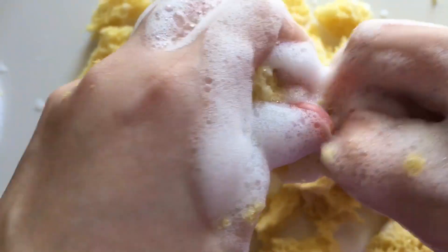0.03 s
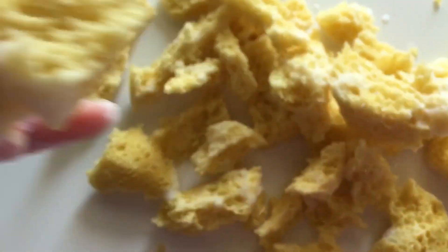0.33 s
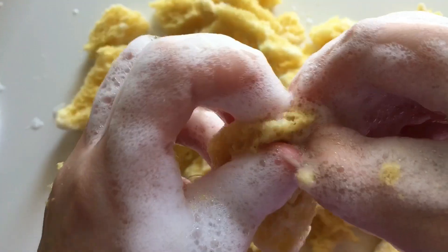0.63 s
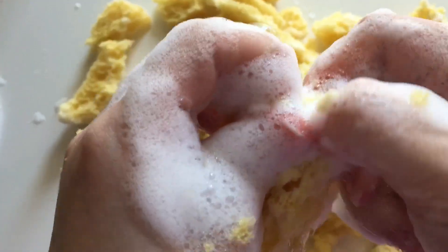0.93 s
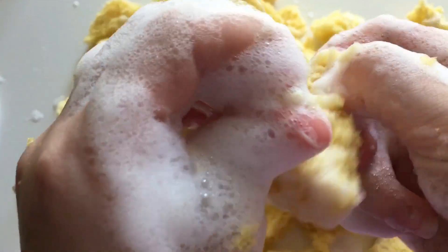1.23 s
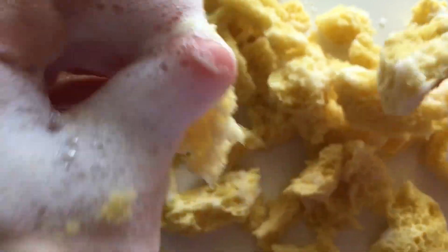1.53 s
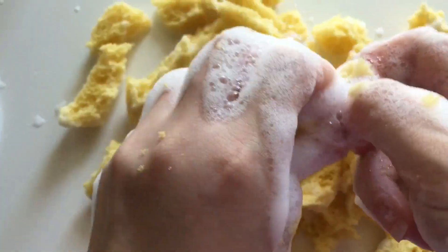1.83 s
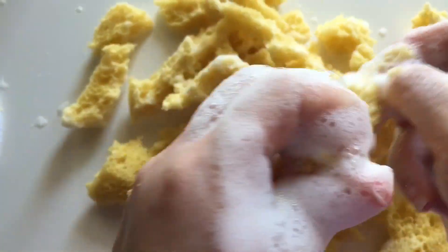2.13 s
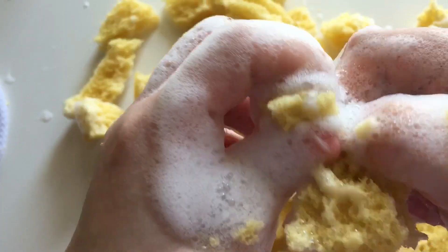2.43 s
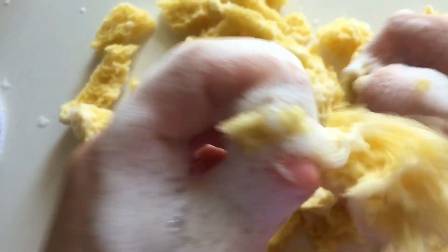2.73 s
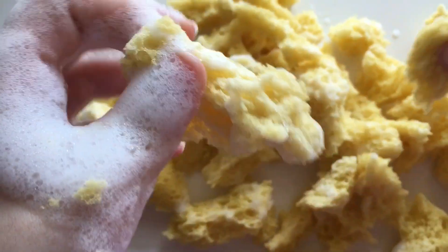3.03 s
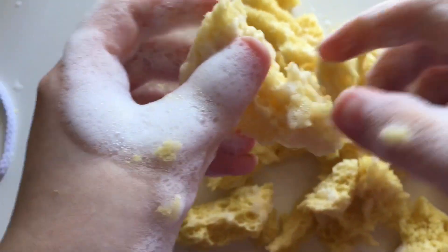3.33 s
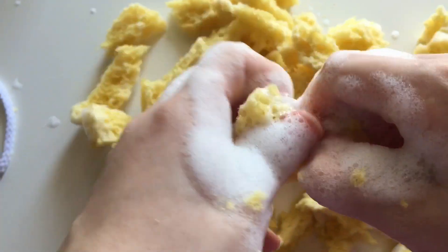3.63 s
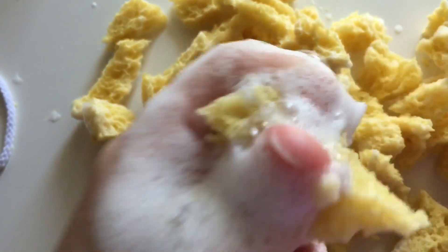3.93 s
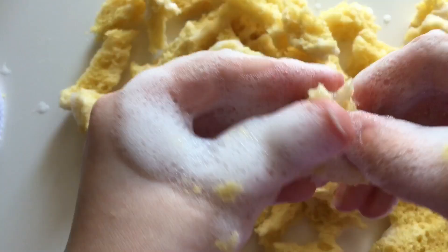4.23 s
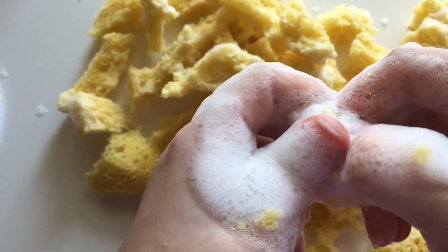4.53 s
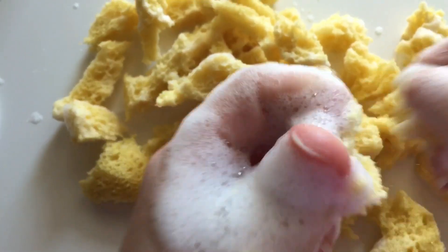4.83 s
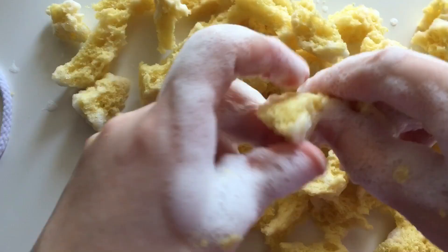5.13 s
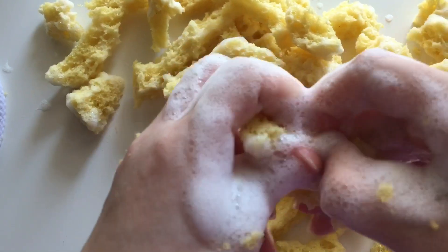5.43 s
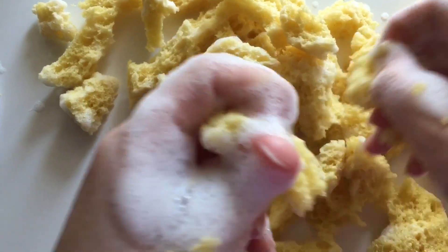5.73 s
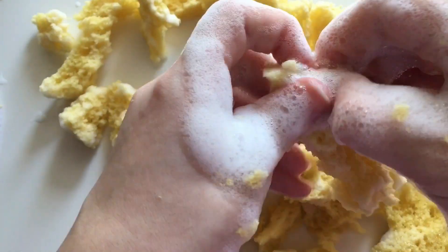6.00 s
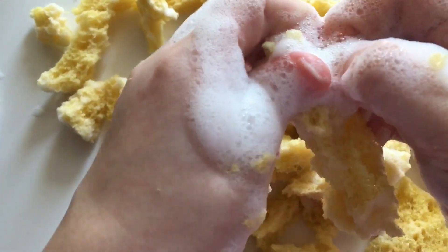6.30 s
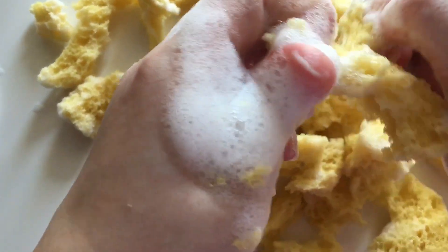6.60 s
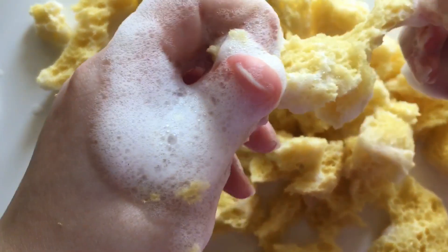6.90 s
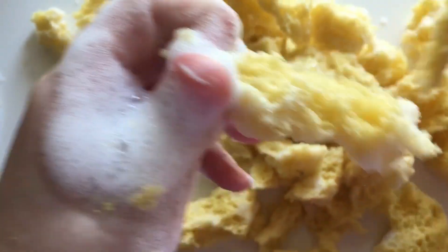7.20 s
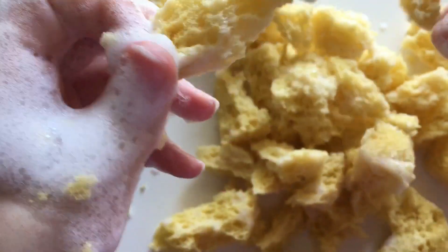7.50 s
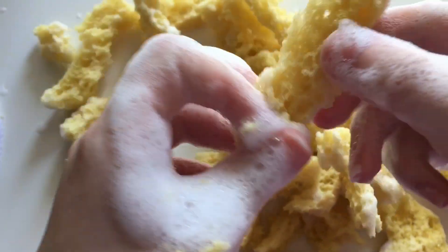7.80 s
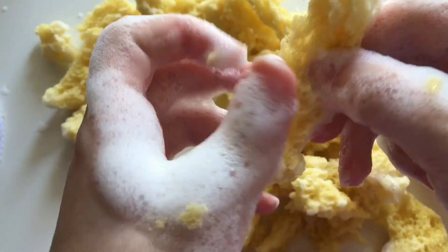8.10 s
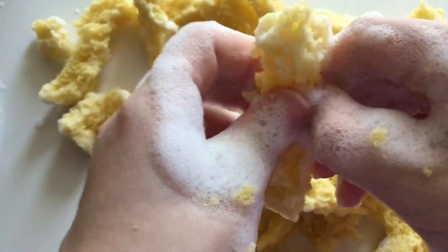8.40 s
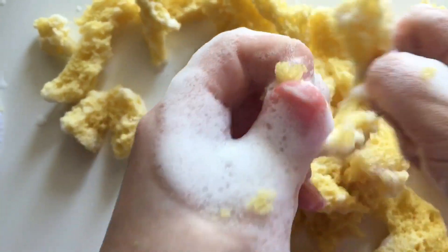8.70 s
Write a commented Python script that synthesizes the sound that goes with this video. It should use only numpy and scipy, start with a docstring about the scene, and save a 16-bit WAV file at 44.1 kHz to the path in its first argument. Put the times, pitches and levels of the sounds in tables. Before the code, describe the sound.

Hands tear a soapy sponge into pieces close to the microphone in a small quiet room. Short, wet, crackling rips come about once a second, some with sharp little snaps and a soft thud as a piece comes free. Between them, fingers knead the lather, which squishes, fizzes and pops quietly. A quick run of small tears comes late, then a lull and one last rip. A faint hum lies behind.

```python
"""A dense wet crackle, close by: hands tear a soapy sponge to pieces in a small quiet room.
In each rip the cell walls snap and the foam fizzes, exciting tiny air pockets as damped resonators.
The sound deepens as the tear opens, and the piece comes free with a soft thud.
Between rips the fingers knead the lather, which squelches and pops; a mains appliance hums behind.
Now and then a faint ring lingers or the level dips briefly."""
import sys
import numpy as np
from scipy import signal
from scipy.fft import rfft, irfft, next_fast_len
from scipy.io import wavfile
from scipy.ndimage import uniform_filter1d, map_coordinates

SR = 44100
rng = np.random.default_rng(int(sys.argv[2]) if len(sys.argv) > 2 else 0)


def wav_out(sig):
    """Save sig, one row per channel (or a flat mono array), as 16-bit PCM at SR to the path in sys.argv[1]."""
    wavfile.write(sys.argv[1], SR, np.round(np.clip(np.atleast_2d(sig).T, -1, 1) * 32767).astype(np.int16))


N = 385875

# Event levels are relative: each source applies its own overall gain.
# tearing pulls: start_s, end_s, tighten_s, wall_db, swell_db, foam_offset_db, pulp_offset_db
TEARING_PULLS = [(0.019, 0.031, 0.033, -30.5, -4, -6, -35), (0.083, 0.176, 0.072, -23, -0.5, -6.5, -14.5),
                 (0.947, 1.11, 0.54, -39.5, -21, -5.5, -16.5), (1.124, 1.277, 0.059, -30, -1, -4.5, -14),
                 (1.272, 1.346, .02, -25.5, 5, -7, -14.5), (1.946, 2.036, 0.28, -27, 1.5, -6, -16),
                 (2.035, 2.136, .02, -27.5, 1, -11.5, -16), (2.525, 2.634, 0.16, -27, 0.5, -12.5, -16.5),
                 (2.631, 2.715, .02, -23, 4, -10.5, -14), (3.802, 3.859, 0.15, -23, -3.5, -8.5, -19),
                 (4.719, 4.778, 0.033, -25.5, -3.5, -8.5, -13), (5.524, 5.658, 0.24, -31, -9, -2, -12),
                 (6.411, 6.48, 0.17, -26, 5, -7.5, -24), (6.482, 6.543, .02, -28, -4, -8, -11),
                 (6.66, 6.697, 0.024, -29, -12, -7.5, -14), (6.708, 6.729, 0.026, -32.5, -2, 2, -8),
                 (6.766, 6.78, 0.0099, -30.5, -11, -3.5, -13), (6.906, 6.949, 0.028, -35, -10, 2, -10),
                 (6.962, 6.985, 0.018, -29.5, -10, -1.5, -12), (7.069, 7.115, 0.0073, -36, -11, -2, -9),
                 (8.511, 8.587, 0.55, -32, -4, -13, -23), (8.58, 8.692, 0.024, -27, -9.5, -4, -12.5)]
# the thickest strands giving way: start_s, level_db
STRAND_SNAPS = [(0.0291, -14), (0.097, -14), (0.108, -4), (0.121, -11), (0.1398, -7), (0.156, -9),
                (0.1716, -14), (1.0037, -12.5), (1.056, -16.5), (1.087, -14.5), (1.1874, -14), (1.209, -21),
                (1.2443, -10.5), (1.3441, -9), (1.959, -15), (1.9862, -10), (1.9988, -12.5), (2.0293, -7),
                (2.0475, -7), (2.0858, -12), (2.095, -9), (2.6789, -15), (2.691, -4), (2.7133, -15),
                (3.8058, -9), (3.8207, -7), (3.8382, -14), (3.859, -21), (4.722, -10), (4.7546, -3.5),
                (5.546, -16), (5.5779, -14), (5.6549, -21), (6.5062, -10), (6.531, -9), (6.6572, -10),
                (6.723, -10), (6.7688, -11.5), (6.9132, -15), (6.923, -16), (6.9687, -17), (6.978, -13),
                (6.9851, -17), (7.0603, -14), (7.079, -17), (7.097, -26), (7.1098, -9), (8.529, -12),
                (8.5617, -18), (8.5973, -8)]
# a piece springing back or landing on the pile: start_s, level_db, pitch_hz
PIECE_THUDS = [(0.157, -14.5, 176), (0.182, -26.5, 73.5), (1.346, -24, 76.6), (2.678, -26, 280),
               (2.698, -15, 270), (2.715, -23, 119), (3.861, -31, 110), (5.624, -24.5, 340),
               (6.53, -21.5, 202), (6.724, -23.5, 352), (7.11, -19.5, 198), (7.255, -36, 62),
               (7.32, -34, 56), (8.612, -29, 334)]
# fingers squeezing the lather: firmest_s, press_s, let_go_s, squish_db, foam_offset_db
FINGER_SQUEEZES = [(0.06, 0.071, 0.068, -35.5, -6), (0.34, 0.043, 0.05, -51, -5),
                   (0.45, 0.1, 0.097, -49, -9), (0.644, 0.016, 0.044, -39.5, -2),
                   (0.74, 0.094, 0.031, -45, -19), (1.07, 0.14, 0.22, -38.5, -5),
                   (1.59, 0.083, 0.047, -55, -1), (1.689, 0.058, 0.065, -45.5, -3.5),
                   (2.28, 0.044, 0.29, -55.5, -14), (2.41, 0.032, 0.0088, -48, -10),
                   (3.06, 0.096, 0.073, -51.5, -5), (3.52, 0.13, .17, -42, -7.5),
                   (4.08, 0.073, 0.04, -46, -3.5), (4.37, 0.36, 0.18, -50, -7.5),
                   (4.68, 0.13, 0.044, -55.5, -6), (5.04, 0.14, 0.1, -52.5, -1.5),
                   (5.18, 0.057, 0.043, -47.5, -10), (5.29, 0.06, 0.081, -43, -6),
                   (5.91, 0.097, 0.029, -50.5, -1), (6.02, 0.15, 0.23, -50, -10),
                   (6.32, 0.016, 0.21, -51.5, 0.5), (6.6, 0.11, 0.17, -37.5, -1.5),
                   (6.86, 0.32, 0.12, -49.5, 8.5), (7.01, 0.13, 0.033, -42.5, 3),
                   (7.35, 0.034, 0.028, -53, 4), (7.951, 0.076, 0.059, -42.5, -5),
                   (8.209, 0.029, 0.015, -49, -13), (8.267, 0.011, 0.013, -46.5, -2.5),
                   (8.39, 0.031, 0.025, -53, 1)]
# fingers holding still: start_s, end_s
STILL_SPANS = [(0.785, 0.82), (1.41, 1.5), (3.15, 3.45), (4.55, 4.63), (6.735, 6.765), (7.16, 7.18),
               (7.41, 7.62), (8.11, 8.175)]
# soapy water and air forced through a gap in the grip: centre_s, length_s, level_db, pitch_hz
GAP_SQUELCHES = [(0.163, .012, -36, 330), (0.443, 0.096, -50, 1670), (1.241, 0.076, -35, 1900),
                 (1.326, .02, -43, 490), (1.945, 0.05, -36, 1920), (2.011, 0.055, -29, 4540),
                 (2.088, 0.038, -31, 3180), (2.472, 0.06, -51.5, 1850), (2.692, 0.008, -26.5, 623),
                 (3.848, 0.013, -31.5, 900), (3.856, 0.0058, -34, 540), (4.067, 0.034, -46, 1900),
                 (4.736, 0.028, -29.5, 3900), (4.854, 0.04, -53.5, 1800), (5.311, 0.058, -48.5, 2660),
                 (5.57, 0.072, -34, 3050), (7.107, 0.0058, -37, 380), (8.15, .01, -53, 600),
                 (8.495, 0.038, -39, 3140), (8.561, 0.03, -26.5, 2660), (8.591, 0.058, -34.5, 1640),
                 (8.616, 0.0076, -31.5, 630)]
# single large bubbles bursting: start_s, level_db, pitch_hz
BUBBLE_BURSTS = [(0.494, -24.5, 2380), (0.6279, -24.5, 3430), (0.767, -25, 3300), (0.7834, -26, 3000),
                 (0.8798, -26, 4000), (0.9196, -21, 2900), (1.8786, -29, 2600), (2.4662, -27, 2480),
                 (3.31, -30, 3480), (3.3819, -31.5, 3220), (3.5122, -31, 3100), (3.7493, -17.5, 3930),
                 (3.7692, -17, 3500), (4.0704, -28, 2100), (4.2962, -28, 2700), (4.4991, -22.5, 3160),
                 (5.2544, -19.5, 4400), (5.4992, -17, 3000), (5.506, -21.5, 3000), (6.3016, -21, 3200),
                 (6.3084, -21, 3450), (6.634, -18, 4200), (6.8018, -17, 7800), (6.8854, -20, 8200),
                 (7.0165, -15.5, 4600), (7.4738, -34.5, 3300), (7.5973, -27.5, 5800)]
# onsets of a faint thin ring: start_s, level_db
RING_ONSETS = [(0.17, -59), (1.69, -57), (2.1, -53)]
# rumble of hands shifting near the microphone: time_s, level_db
HAND_MOTION = [(0, -51), (.25, -58), (.7, -63), (1.38, -53), (1.55, -67), (2.5, -59), (2.75, -58),
               (2.95, -60), (6.1, -58.5), (6.65, -52), (7.35, -50), (7.7, -55.5), (8.75, -63)]
# spectra of cell walls, foam, wet pulp, squeezed lather, room air and hands: frequency_hz, gain_db
WALL_SPECTRUM = [(300, -53), (800, -5.5), (1300, 4), (1900, 3), (3000, 1.5), (4200, 5.5), (5000, 3),
                 (7000, 0), (10000, -1), (16000, -16)]
FOAM_SPECTRUM = [(2500, -15), (5000, -4.5), (7000, -5), (9200, -1), (10400, -9.5), (12000, -6),
                 (15800, -10)]
PULP_SPECTRUM = [(60, 11), (150, -6.5), (300, 1.5), (500, 1.5), (800, 4), (1300, 9.5), (3000, -36)]
SQUISH_SPECTRUM = [(400, -2.5), (1000, -7.5), (1600, -1), (2800, -0.5), (4200, 3), (5200, 0.5),
                   (7000, -0.5), (10000, -6.5), (16000, -19)]
AIR_SPECTRUM = [(26, -21), (47, 6.5), (70, -0.5), (130, -3), (200, -8.5), (400, -8.5), (800, -12.5),
                (1600, -10), (2500, -21.5), (6000, -50), (16000, -29)]
RUMBLE_SPECTRUM = [(28, -12), (48, -7.5), (75, -6.0), (160, -12.0), (500, -56), (2000, -84)]
# partials of the mains hum: frequency_hz, level_db
HUM_PARTIALS = [(99.3, -56.5), (149, -64.5), (199, -71), (300, -72.5)]
# reverberation time of the room: frequency_hz, t60_s
ROOM_DECAY = [(150, 0.18), (1500, 0.17), (5000, 0.1), (15000, 0.12)]
# brief dips in the overall level: start_s, depth_db, recovery_s
LEVEL_DIPS = [(0.538, 34, 0.014), (1.642, 14, 0.02), (2.352, 26, 0.013), (4.193, 42, 0.012),
              (5.092, 27, 0.016), (5.839, 14, 0.013)]
# ripples in the microphone's response: centre_hz, half_width_hz, gain_db
MIC_RIPPLES = [(2290, 100, -1.56), (2910, 91, 2), (4930, 150, -4.5)]


def rips():
    """Impulse excitation: walls snap by the thousand, foam bursts and wet pulp pops as a tear opens."""
    wall_gain, foam_gain, pulp_gain, hollow_hz = tearing()
    catching_db = 0.62 * wobble(190)  # the tear catches and runs on
    wander = np.exp(0.15 * wobble(45))  # the wet pockets keep changing size
    walls = crackle(count=18000, pitch_hz=0.96 * hollow_hz * wander, scatter=0.32, cycles=0.66,
                    spread_db=2.0, clump_db=catching_db, blur=0.28, spectrum=WALL_SPECTRUM, size=200)
    foam = crackle(count=30000, pitch_hz=9200, scatter=0.38, cycles=0.62,
                   spread_db=3.5, clump_db=1.3 * catching_db, blur=0.45, spectrum=FOAM_SPECTRUM, size=32)
    pulp = crackle(count=4000, pitch_hz=0.16 * hollow_hz, scatter=0.61, cycles=0.69,
                   spread_db=1.5, clump_db=catching_db, blur=0.98, spectrum=PULP_SPECTRUM, size=512)
    return amp(-0.6) * wall_gain * walls + amp(3.0) * foam_gain * foam + pulp_gain * pulp


def tearing():
    """Cavity resonance: the hollow deepens as a tear opens. Gives wall, foam, pulp gains and pitch."""
    attack_share, release_s = 0.081, 0.0022
    mid_pull_hz, deepening = 2930.0, 0.035
    arch_db = 2.5  # a pull is softer at its ends
    foam_rise_db, pulp_rise_db = 8.5, 9  # both grow as the tear reaches the wet core
    t = np.arange(N) / SR
    gains, hollow_hz = np.zeros((3, N)), np.full(N, mid_pull_hz)
    for start, end, _, wall_db, swell_db, foam_offset_db, pulp_offset_db in TEARING_PULLS:
        span = slice(int(start * SR), int((end + 10 * release_s) * SR))
        progress = (t[span] - start) / (end - start)
        opening = np.clip(progress, 0, 1) - 0.5
        attack = np.clip(progress / attack_share, 0, 1)
        release = np.exp(-np.maximum(t[span] - end, 0) / release_s)
        tear_db = wall_db + swell_db * opening - arch_db * (2 * opening) ** 2
        foam_db = tear_db + foam_offset_db + foam_rise_db * opening
        pulp_db = tear_db + pulp_offset_db + pulp_rise_db * opening
        gains[:, span] = np.maximum(gains[:, span], attack * release * amp([tear_db, foam_db, pulp_db]))
        hollow_hz[span] = mid_pull_hz * np.exp(-deepening * opening)
    return *gains, hollow_hz


def snaps(neighbours):
    """Resonance glide: a strand and its neighbours break, and the opening pocket falls in pitch."""
    onset_hz, octave_fall_s = 4620, 0.00139
    starts, levels_db = np.transpose(STRAND_SNAPS)
    strands, age = np.zeros(N + SR), np.arange(SR // 100) / SR
    for start, level_db, detune in zip(starts, levels_db, rng.standard_normal(len(starts))):
        turns = onset_hz * np.exp(0.14 * detune) * octave_fall_s * np.log1p(age / octave_fall_s)
        chirp = np.sin(2 * np.pi * turns) * turns * np.exp(-turns / 1.085)
        strands[int(start * SR):][:len(age)] += amp(level_db - 4.5) * chirp / np.abs(chirp).max()
    lag = rng.exponential(size=(len(starts), neighbours))
    times = starts[:, None] + 0.0011 * lag
    gain = amp(levels_db[:, None] - 9.5 - 2.6 * lag)
    pitch_hz = 5200 * np.exp(0.5 * rng.standard_normal(lag.shape))
    return strands[:N] + pops(times.ravel(), gain.ravel(), pitch_hz.ravel(), cycles=0.8, size=160)


def thuds():
    """Heavy damping: a soft piece springs back or lands, and its motion dies within a cycle or two."""
    out, age = np.zeros(N + SR), np.arange(SR // 8) / SR
    for start, level_db, pitch_hz in PIECE_THUDS:
        turns = pitch_hz * age
        push = np.sin(2 * np.pi * turns) * np.exp(-turns / 0.6) * (1 - np.exp(-turns / 0.16))
        out[int(start * SR):][:len(age)] += amp(level_db - 4.5) * push / np.abs(push).max()
    return out[:N]


def kneading():
    """Intermittent flow: lather squeezed through the pores clicks in spurts as its films let go."""
    film_count, spurt_decay_s = 300, 0.0017
    squish_gain, foam_gain = pressing()
    film_at = rng.integers(0, N, size=film_count)
    films = np.bincount(film_at, np.minimum(rng.exponential(size=film_count), 1.3), N)
    spurts = signal.lfilter([1], [1, -np.exp(-1 / (spurt_decay_s * SR))], films)
    spurt_db = 20 * np.log10(1 + 3.0 * spurts)
    squish = crackle(count=22000, pitch_hz=2830, scatter=0.43, cycles=0.67,
                     spread_db=2.5, clump_db=spurt_db, blur=0.3, spectrum=SQUISH_SPECTRUM, size=128)
    foam = crackle(count=16000, pitch_hz=8400, scatter=0.28, cycles=0.55,
                   spread_db=4.0, clump_db=spurt_db, blur=0.46, spectrum=FOAM_SPECTRUM, size=32)
    return holding() * (amp(0.93) * squish_gain * squish + amp(0.64) * foam_gain * foam)


def pressing():
    """Incoherent addition: resting lather, squeezes and grip sum in power to squish and foam gains."""
    full_grip_db, grip_rise_db, grip_foam_db = -41.5, 29.5, -28
    settle_db, settle_db_per_s = -55, 161
    rest_squish_db, rest_foam_db = -61, -61.5
    t = np.arange(N) / SR
    squish_power, foam_power = np.full(N, amp(rest_squish_db) ** 2), np.full(N, amp(rest_foam_db) ** 2)
    for firmest, press_s, let_go_s, squish_db, foam_offset_db in FINGER_SQUEEZES:
        from_peak = (t - firmest) / np.where(t < firmest, press_s, let_go_s)
        power = (amp(squish_db) * np.exp(-np.minimum(from_peak ** 2, 20))) ** 2
        squish_power += power
        foam_power += power * amp(foam_offset_db) ** 2
    grip_db = np.full(N, -np.inf)
    for start, end, tighten_s, *_ in TEARING_PULLS:
        tightening_db = full_grip_db - grip_rise_db * (start - t) / tighten_s
        settling_db = settle_db - settle_db_per_s * np.maximum(t - end, 0)
        grip_db = np.maximum(grip_db, np.where(t < start, tightening_db, settling_db))
    squish_power += amp(grip_db) ** 2
    foam_power += amp(grip_db + grip_foam_db) ** 2
    return np.sqrt(squish_power), np.sqrt(foam_power)


def holding(hold_db=-7.5, edge_s=0.0085):
    """Reduced excitation: the gain of the lather sinks while the fingers hold still."""
    t = np.arange(N) / SR
    still = sum(np.tanh((t - start) / edge_s) - np.tanh((t - end) / edge_s) for start, end in STILL_SPANS)
    return amp(hold_db * still / 2)


def squelches(count):
    """Bubble resonance: a cloud of like-sized bubbles in one narrow gap rings near one pitch."""
    out = np.zeros(N)
    for centre, length_s, level_db, pitch_hz in GAP_SQUELCHES:
        offset, strength, detune = rng.standard_normal((3, count))
        times = centre + length_s * offset / 2
        cloud = pops(times, amp(5.8 * strength), pitch_hz * np.exp(0.07 * detune), cycles=1.65, size=1400)
        out += amp(level_db) * cloud * np.sqrt(2 * length_s * SR / np.sum(cloud ** 2))
    return out


def bubbles(droplets):
    """Film rupture: a large bubble bursts with a short damped tick and scatters a few droplets."""
    starts, levels_db, pitch_hz = np.transpose(BUBBLE_BURSTS)
    lag = rng.exponential(size=(len(starts), droplets))
    times = starts[:, None] + 0.0007 * lag
    gain = amp(levels_db[:, None] - 6) * np.exp(-lag / 2)
    droplet_hz = pitch_hz[:, None] * np.exp(rng.standard_normal(lag.shape) / 2)
    spray = pops(times.ravel(), gain.ravel(), droplet_hz.ravel(), cycles=1.0, size=128)
    return pops(starts, amp(levels_db), pitch_hz, cycles=0.86, size=128) + spray


def ring(pitch_hz=2780, t60_s=0.93):
    """Free decay: one narrow mode is set going and fades exponentially."""
    out, age = np.zeros(N + SR), np.arange(SR) / SR
    tone = np.sin(2 * np.pi * pitch_hz * age) * amp(-60 * age / t60_s)
    for start, level_db in RING_ONSETS:
        out[int(start * SR):][:SR] += amp(level_db) * tone
    return out[:N]


def room(x):
    """Reverberation: a short diffuse tail whose treble dies first."""
    hz, t, noise = signal.stft(rng.standard_normal(SR // 2), SR, nperseg=256)
    decay = amp(-60 * t / along(ROOM_DECAY, hz)[:, None])
    tail = signal.istft(noise * decay, SR, nperseg=256)[1]
    delayed = np.pad(x, (SR // 300, 0))
    return signal.fftconvolve(delayed, tail / np.linalg.norm(tail))[:N]


def background():
    """Noise floor: room air, a slightly unsteady mains hum and the rumble of moving hands."""
    t = np.arange(N) / SR
    air = amp(-56.0) * unit(coloured(rng.standard_normal(N), AIR_SPECTRUM))
    hum = np.zeros(N)
    for hz, level_db in HUM_PARTIALS:
        peak = np.sqrt(2) * amp(level_db + 0.92 * wobble(6.9))
        hum += peak * np.sin(2 * np.pi * hz * t + 0.26 * wobble(1.81))
    rumble = unit(coloured(rng.standard_normal(N), RUMBLE_SPECTRUM))
    hand_db = np.interp(t, *np.transpose(HAND_MOTION))
    return air + hum + amp(hand_db - 2.5) * rumble


def dips():
    """Amplitude modulation: the level drops at once and swells back."""
    t = np.arange(N) / SR
    return amp(-sum(depth_db * (t > start) * np.exp(-np.abs(t - start) / recovery_s)
                    for start, depth_db, recovery_s in LEVEL_DIPS))


def crackle(count, pitch_hz, scatter, cycles, spread_db, clump_db, blur, spectrum, size):
    """Shot noise at rms 1: clumps of random pops, mostly small, over a blur of unresolved ones."""
    at = rng.integers(0, N, count)
    strength = amp(spread_db * np.minimum(rng.exponential(size=count), 4.5))
    detune = np.clip(rng.standard_normal(count), -2, 2)
    hz = np.broadcast_to(pitch_hz, N)[at] * np.exp(scatter * detune)
    stream = unit(pops(at / SR, strength, hz, cycles, size)) + blur * rng.standard_normal(N)
    stream = coloured(stream * amp(clump_db), spectrum)
    # the hands spend about the same energy in every instant
    local_power = np.abs(uniform_filter1d(stream ** 2, size=1600))
    return stream / np.sqrt(local_power + 1e-12)


def pops(start_s, gain, hz, cycles, size):
    """Damped oscillators: struck air pockets decay by 1/e in `cycles` periods, cut at `size` samples."""
    turns = np.outer(np.minimum(hz, SR * 0.45), np.arange(size) / SR)
    rings = np.diff(np.sin(2 * np.pi * turns) * np.exp(-turns / cycles), axis=1)
    rings *= (gain / (np.abs(rings).max(axis=1) + 1e-9))[:, None]
    at = np.abs(start_s * SR).astype(int)[:, None] + np.arange(size - 1)
    return np.bincount(at.ravel(), rings.ravel(), N)[:N]


def coloured(x, spectrum, size=4096):
    """Minimum-phase filtering: folding the cepstrum gives a causal response with this spectrum."""
    magnitude = amp(along(spectrum, np.fft.rfftfreq(size, 1 / SR)))
    cepstrum = irfft(np.log(magnitude))
    cepstrum[1:size // 2] *= 2
    cepstrum[size // 2 + 1:] = 0
    return signal.fftconvolve(x, irfft(np.exp(rfft(cepstrum))))[:N]


def wobble(rate_hz):
    """Random modulation: a smooth curve through rate_hz random knots a second."""
    knots = rng.standard_normal(int(N * rate_hz / SR) + 4)
    return map_coordinates(knots, [np.arange(N) * rate_hz / SR])


def along(points, hz):
    """Interpolation of (frequency_hz, value) points on a logarithmic frequency axis."""
    point_hz, values = np.transpose(points)
    return np.interp(np.log(hz + 1), np.log(point_hz + 1), values)


def amp(db):
    """Amplitude ratio of a level in decibels."""
    return 10 ** (np.asarray(db) / 20)


def unit(x):
    """Normalisation to rms 1."""
    return x / np.sqrt(np.mean(x ** 2) + 1e-20)


def scene():
    """Superposition: the direct sound, its reflection off the table, the room and the background."""
    echo_s, echo_db = 0.00315, -19
    sponge = (rips() + kneading() + squelches(count=60)
              + snaps(neighbours=10) + bubbles(droplets=5) + thuds())
    table_echo = amp(echo_db) * np.pad(sponge, (int(echo_s * SR), 0))[:N]
    reverb = amp(-15.5) * room(sponge)
    return ((sponge + table_echo + reverb + ring() + background()) * dips())[None]


def record(dry):
    """Frequency response: a small microphone cuts deep bass and adds ripples; the band is limited."""
    low_cut_hz, band_limit_hz = 40, 15950
    thin = signal.sosfilt(signal.butter(4, low_cut_hz, "high", fs=SR, output="sos"), dry)
    size = next_fast_len(N + SR // 2)
    hz = np.fft.rfftfreq(size, 1 / SR)
    ripple_db = sum(db * np.exp(-((hz - centre) / width) ** 2) for centre, width, db in MIC_RIPPLES)
    return irfft(rfft(thin, size) * amp(ripple_db) * (hz < band_limit_hz), size)[:, :N]


dry = scene()
out = record(dry)
wav_out(out)
```